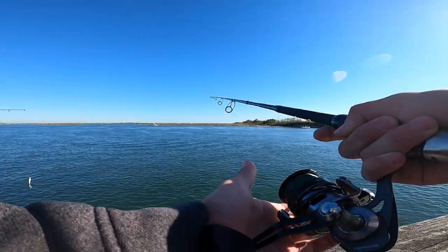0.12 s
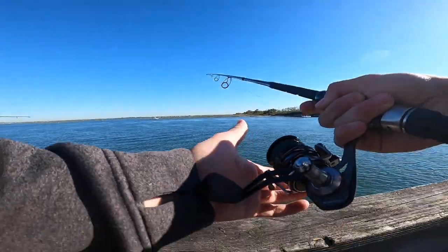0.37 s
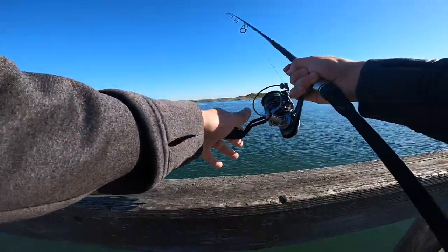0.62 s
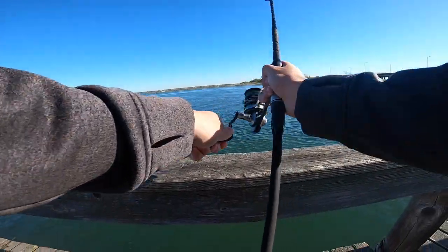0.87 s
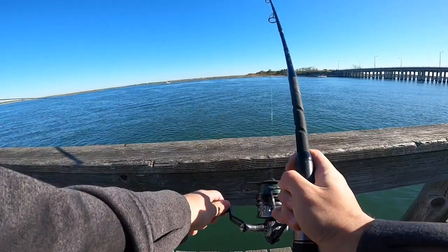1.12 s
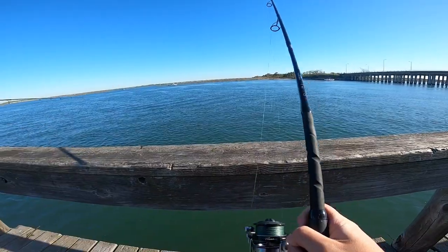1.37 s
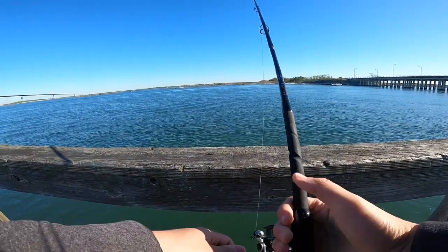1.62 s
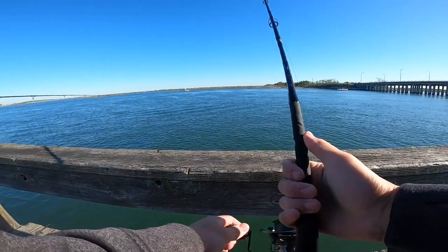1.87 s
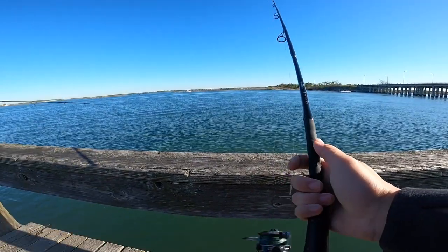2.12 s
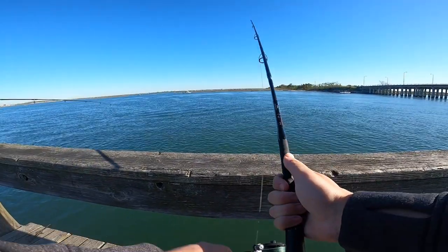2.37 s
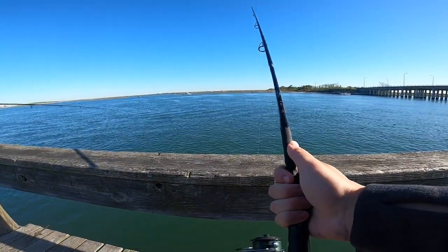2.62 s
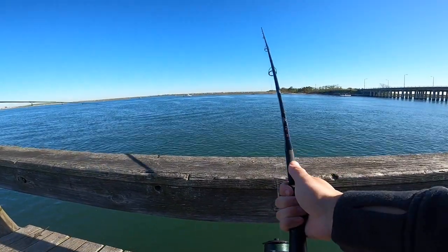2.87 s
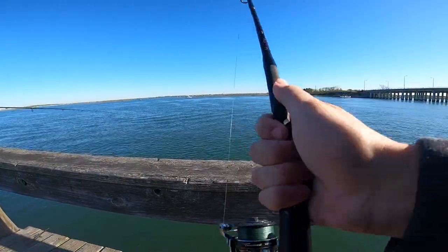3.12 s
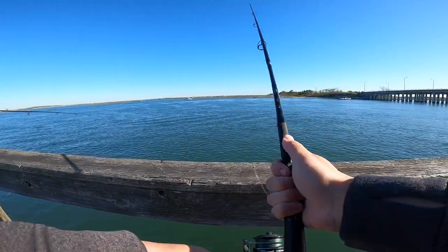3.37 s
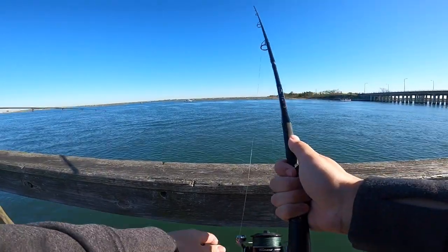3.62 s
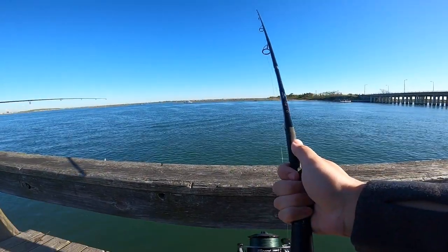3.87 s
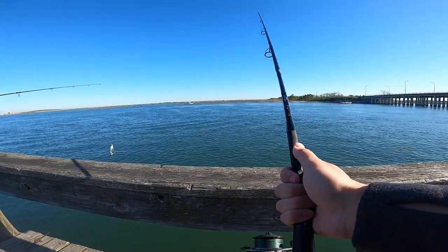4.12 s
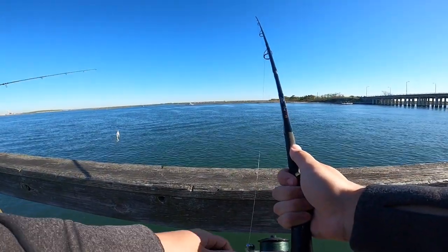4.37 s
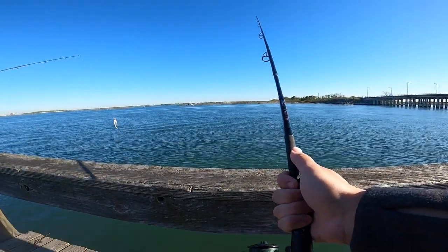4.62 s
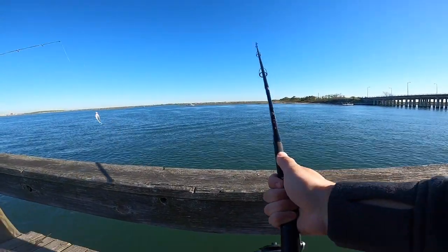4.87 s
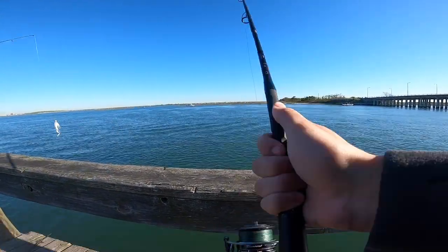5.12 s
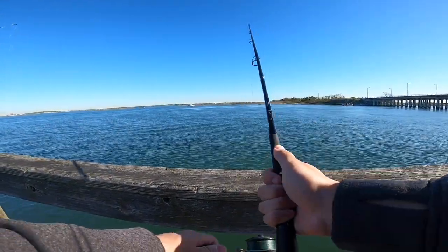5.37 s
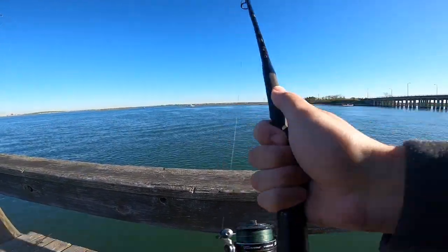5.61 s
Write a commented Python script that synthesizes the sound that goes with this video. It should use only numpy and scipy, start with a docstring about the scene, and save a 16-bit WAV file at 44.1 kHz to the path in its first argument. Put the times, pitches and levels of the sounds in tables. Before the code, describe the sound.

On an outdoor pier, a deep far engine throbs under a dull wash of water and distant traffic. Close to the microphone a fishing reel is cranked with irregular sharp clicks and fine rattling for about three seconds. A low gust thumps midway, a faint double hoot passes and a rod swishes. The wash then widens, with dull bumps, a thin hiss and two more short swishes.

```python
"""From the start a far engine throbs near 44 Hz, by beating tones, under a wash of water and traffic: shaped
noise. A reel is cranked close by for three seconds: parts strike, rebound and ring body modes, amid dense ticks
and knocks. A gust of low noise passes, a faint hoot sounds twice and a rod swishes: fluttering noise with
vortex whistles. The stereo image then widens; a gust thumps low, then a thin high hiss. Two more swishes close
the scene, the last among a few clicks."""
import sys
import numpy as np
from scipy import signal
from scipy.fft import rfft, irfft, next_fast_len
from scipy.io import wavfile
from scipy.ndimage import uniform_filter1d

SR = 44100
rng = np.random.default_rng(int(sys.argv[2]) if len(sys.argv) > 2 else 0)


def invert_db(x):
    """Field ratio 10**(x/20) for x, a level in decibels (scalar or array-like)."""
    u = np.asarray(x, float) / 20
    return 10 ** u


def master(y):
    """Save y as 16-bit WAV."""
    cut = np.clip(np.atleast_2d(y).T, -1, 1)
    pcm = np.round(cut * 32767)  # scale
    wavfile.write(sys.argv[1], SR, pcm.astype(np.int16))


N = 253123
T = np.arange(N) / SR

# Firing pitch of the engine. Each row: time in seconds, pitch in Hz.
FIRING_HZ = [(0, 45.03), (1.85, 45.03), (2.4, 44.45), (3.2, 44.35), (3.7, 44.0), (4.2, 43.95), (4.7, 44.23),
             (5.74, 44.23)]
# Upper orders of the engine. Each row: multiple of the firing pitch, rms in dB over the firing tone's peak.
ENGINE_ORDERS = [(2, -21.5), (6.5, -29)]
# Loudness of the firing tone. Each row: time in seconds, rms in dB.
FIRING_LEVEL = [(0, -33.5), (.55, -29.5), (1.3, -33.5), (2, -30), (3, -26.5), (4.2, -27.5), (5, -26.5),
                (5.74, -27.5)]
# Fainter tones that beat with it. Each row: pitch at start in Hz, pitch at end in Hz, first dip in seconds.
BEATING_TONES = [(40.46, 40.46, .17), (49.3, 49.76, .204)]
# Loudness of those tones, one curve for each. Each row of a curve: time in seconds, rms in dB.
BEATING_LEVELS = [
    [(0, -42), (1.2, -36.5), (1.8, -56), (3.6, -46), (5.74, -43)],
    [(0, -33), (1, -35.5), (2.2, -38), (4.3, -42), (5.74, -38)],
]
# Spectrum of the wash. Each row: frequency in Hz, relative density in dB per Hz.
WASH_SPECTRUM = [(38, -10), (64, -1.5), (92, -10.5), (252, -19), (380, -22), (614, -32.5), (807, -35.5),
                 (1010, -32), (1560, -36), (2110, -47), (3250, -52.5), (8100, -73.5), (9940, -99)]
# Drift of the wash. Each row: time in seconds, relative level in dB, centre of the tyre-roar hump in Hz.
WASH_DRIFT = [(0, 9.5, 950), (0.503, 10, 1094), (1, 10, 1354), (1.7, 7, 1107), (2.499, 6, 1410),
              (3.499, 5.5, 1235), (4.498, 5, 1605), (5.74, 8, 1490)]
# Side part of the wash before the stereo image widens. Each row: frequency in Hz, side over mid in dB.
WASH_SIDE_RATIO = [(60, -36), (180, -61), (550, -22.5), (1650, -20.5), (4970, -12.5), (15000, 1)]
# Opening of the stereo width. Each row: time in seconds, gain of the side part in dB.
SIDE_OPENING = [(3.25, -54), (3.5, -3.5), (4, 8.5)]
# Wind gusts on the ports. Each row: centre in seconds, rms at the centre in dB, time to 1/e in seconds.
WIND_GUSTS = [(1.76, -26, 0.11), (4.571, -25.5, 0.043)]
# Fine rattle of gears and line while the handle turns. Each row: time in seconds, level in dB.
RATTLE_LEVEL = [(0, -78.5), (.3, -80), (.5, -59.5), (.65, -52.5), (.85, -63.5), (.95, -57), (1.05, -60.5),
                (1.5, -63), (1.85, -58.5), (2, -66), (2.25, -59), (2.65, -66.5), (3.1, -64), (3.32, -67.5),
                (3.4, -73), (3.8, -120)]
# Spectrum of the fine rattle. Each row: frequency in Hz, relative density in dB per Hz.
RATTLE_SPECTRUM = [(1500, -38), (2500, -5), (4600, -8), (8500, -14), (11000, -14), (15500, -25)]
# Larger reel clicks. Each row: start of the blow in seconds, peak in dB before the high-pass, centre in Hz.
REEL_CLICKS = [(0.097, -52, 7000), (0.217, -53, 5830), (0.279, -53, 7500), (0.332, -31.5, 6660),
               (0.354, -46, 8200), (0.371, -39, 3250), (0.434, -33.5, 4600), (0.459, -33, 4400),
                (0.501, -48, 5500), (0.526, -35.5, 7300), (0.583, -32, 6650), (0.593, -27.5, 4000),
               (0.618, -32, 3000), (0.6623, -32, 3790), (0.6842, -27, 3950), (0.7496, -35, 4400),
               (0.779, -37, 4440),  (0.7954, -32.5, 3800), (0.813, -31.5, 3900),  (0.852, -43, 4670),
               (0.9057, -31, 5040), (0.9329, -23.5, 4100), (0.9684, -35, 3200), (1.0357, -36, 4600),
               (1.0914, -43.5, 7300), (1.1305, -32.5, 3200), (1.158, -38, 6740), (1.216, -31.5, 4630),
               (1.229, -29.5, 6400), (1.343, -34.5, 3770),  (1.4702, -39, 3260),  (1.556, -43, 2880),
               (1.5895, -23, 4630), (1.595, -25, 4350), (1.622, -28.5, 4000), (1.636, -17.5, 3940),
                (1.692, -39, 7150), (1.726, -24.5, 6800), (1.731, -35.5, 5950), (1.7782, -35.5, 4400),
               (1.807, -23, 4900), (1.8175, -32.5, 3850), (1.9386, -39, 6700), (2.122, -39, 3060),
               (2.161, -31, 5800), (2.167, -46, 3500), (2.189, -26, 5200), (2.215, -43, 3500),
               (2.2407, -37, 6650), (2.274, -25, 5000), (2.28, -37, 5450), (2.3255, -41, 4570),
               (2.382, -34.5, 3900), (2.394, -27.5, 6400), (2.435, -25.5, 4580), (2.4572, -32, 7600),
               (2.485, -36.5, 5600),  (2.564, -33, 3680), (2.583, -32, 7640), (2.7115, -37, 3420),
               (2.7651, -44, 3080), (2.876, -32.5, 3670), (2.9266, -18.5, 5400), (2.981, -23, 4400),
               (3.003, -26, 4800), (3.039, -27.5, 4150), (3.055, -45, 3800), (3.111, -37.5, 7150),
               (3.125, -41, 7660), (3.226, -43.5, 6200), (3.239, -42, 6200), (3.269, -41, 7500),
               (3.279, -28.5, 4300), (3.292, -41, 4260), (3.301, -39, 5960), (3.574, -46, 3270),
                (4.948, -52, 7460), (5.003, -49, 4300), (5.121, -47, 4340), (5.464, -46, 5470),
               (5.505, -40, 1710), (5.56, -37, 3410)]
# Modes of the reel body. Each row: frequency in Hz, relative level in dB, decay by 60 dB in seconds.
REEL_MODES = [(2300, 7, 0.04), (2700, 7, 0.0085), (3300, 8, 0.012), (4000, 2, 0.017), (4730, 6, 0.012),
              (5500, 0, 0.024), (6600, 13.5, 0.0043), (7450, 8, 0.021), (8430, 7, 0.024)]
# Dull knocks through rod and clothing; the rows near 4.5 s are low thumps of the gust on the ports. # Each row:
# start in seconds, relative level in dB, pitch in Hz, decay by 60 dB in seconds.
KNOCKS_AND_THUMPS = [(0.57, -29, 365, 0.054), (0.582, -29.5, 580, 0.045), (0.6707, -15.5, 370, 0.014),
                     (1.002, -17, 100, 0.13), (1.023, -24, 185, 0.11), (1.478, -30.5, 502, 0.06),
                     (3.604, -32, 533, 0.069), (4.508, -24, 58.6, 0.11), (4.554, -22.5, 150, 0.033),
                     (4.571, -24, 67.5, 0.072)]
# Faint far hoots. Each row: centre in seconds, tone peak in dB, time to 1/e in seconds.
FAR_HOOTS = [(2.88, -40.5, 0.03), (2.99, -42.5, 0.03)]
# Rod swishes. Each row: pip in seconds, fastest moment in seconds, level there in dB, swell in dB per second,
# shedding pitch at the top in Hz, pitch at rest in Hz, fade in dB per second, whistle lingering in seconds.
ROD_SWISHES = [(3.099, 3.144, -42.5, 277, 1129, 1043, 275, 0.019),
               (5.061, 5.086, -42.5, 217, 1227, 1020, 239, 0.065),
               (5.541, 5.574, -37.5, 479, 1770, 1385, 219, 0.02)]
# Spectrum of the rushing air. Each row: frequency in Hz, relative density in dB per Hz.
RUSH_SPECTRUM = [(1000, 2.5), (1700, 9.5), (2260, -11), (2400, -3.5), (3490, 3.5), (5520, -15),
                 (12000, -28.5), (15600, -75.5)]
# Partials of the whistle. Each row: multiple of the shedding pitch, relative level in dB.
WHISTLE_PARTIALS = [(1, 1), (2, 2.5), (3, 3)]
# Faint high hiss, perhaps line through the guides. Each row: time in seconds, relative level in dB.
HISS_LEVEL = [(4.7, -125), (4.748, -78), (4.762, -64.5), (4.845, -60), (4.875, -63), (4.91, -69), (5, -70),
              (5.1, -125)]
# Spectrum of that hiss. Each row: frequency in Hz, relative density in dB per Hz.
HISS_SPECTRUM = [(3800, -10.5), (4600, -13), (5600, -12), (7200, -17), (9000, -22.5), (12000, -51)]
# Thin sinking bands in it. Each row: frequency at first in Hz, relative level in dB.
HISS_BANDS = [(4800, -4), (5650, -2), (7100, -9), (7900, -13)]
# Treble loss of the sealed microphone ports. Each row: frequency in Hz, gain in dB.
PORT_RESPONSE = [(8500, -1), (10000, -7), (16000, -16.5)]


def evened(x):
    """Normalisation of power: scales to rms 1."""
    return x / np.sqrt(np.mean(x ** 2) + 1e-20)


def read(points, hz):
    """Interpolation of a spectrum on a logarithmic frequency axis."""
    f, value = np.transpose(points)
    return np.interp(np.log(hz + 1), np.log(f + 1), value)


def level(rows):
    """Amplitude envelope: gain interpolated along a curve of seconds and dB."""
    return invert_db(np.interp(T, *np.transpose(rows)))


def uneven(noise, size, db):
    """Random amplitude modulation: a gain from noise averaged over size samples, wandering by db rms."""
    return invert_db(db * evened(uniform_filter1d(noise, size=size)))


def bump(rows):
    """Superposition of Gaussian envelopes, each row giving centre, level and time to 1/e."""
    return sum(invert_db(db) * np.exp(-((T - s) / half) ** 2) for s, db, half in rows)


def add(mix, s, sound):
    """Superposition: mixes a sound in at s seconds."""
    part = mix[max(round(s * SR), 0):][:len(sound)]
    part += sound[:len(part)]


def coloured(x, points):
    """Linear filtering in the frequency domain by a spectrum, then rms 1."""
    size = next_fast_len(len(x))
    gain = invert_db(read(points, np.fft.rfftfreq(size, 1 / SR)))
    return evened(irfft(rfft(x, size) * gain, size)[:len(x)])


def resonate(x, hz, width_hz):
    """Heterodyne resonator: shifts the curve hz down to zero, smooths, and shifts back."""
    turn = np.exp(2j * np.pi * np.cumsum(hz * np.ones(len(x))) / SR)
    r = np.exp(-np.pi * width_hz / SR)
    return 2 * (turn * signal.lfilter([1 - r], [1, -r], x / turn)).real


def resonate_twice(x, hz, width_hz):
    """Cascaded resonance: two equal resonators in series give steeper skirts."""
    return resonate(resonate(x, hz, width_hz), hz, width_hz)


def engine():
    """Beating: two close tones interfere with the firing tone and make it throb."""
    hz = np.interp(T, *np.transpose(FIRING_HZ))
    turns = np.cumsum(hz) / SR
    tone = np.cos(2 * np.pi * turns)
    for k, db in ENGINE_ORDERS:  # the upper orders arrive smeared by the air
        tone += invert_db(db) * evened(resonate(rng.standard_normal(N), k * hz, 2.2))
    out = level(FIRING_LEVEL) * tone
    for (start_hz, end_hz, dip_s), rows in zip(BEATING_TONES, BEATING_LEVELS):
        ahead = np.cumsum(np.linspace(start_hz, end_hz, N)) / SR - turns
        # opposite in phase to the firing tone at dip_s
        phase = turns + ahead - np.interp(dip_s, T, ahead)
        out -= level(rows) * np.cos(2 * np.pi * phase)
    return np.sqrt(2) * out


def wash():
    """Random-phase spectral synthesis: mid and side of patchy noise with a slowly moving hump."""
    mid_rms_db, patchy_db = -33, 1.5
    hump_db, hump_width = 7.0, 0.53  # width in natural-log frequency
    frames, hz = N // 256 + 5, np.fft.rfftfreq(1024, 1 / SR)
    a, b, c, d, patches = rng.standard_normal((frames, 513, 5)).T
    patches = uniform_filter1d(patches, size=10, axis=0)
    patches = evened(uniform_filter1d(patches, size=14, axis=1))
    s, db, centre = np.transpose(WASH_DRIFT)
    t = np.arange(frames) * 256 / SR
    distance = np.log((hz[:, None] + 1) / np.interp(t, s, centre))
    hump = hump_db * np.exp(-(distance / hump_width) ** 2)
    side_gain = invert_db(read(WASH_SIDE_RATIO, hz))[:, None]
    z = np.array([a + 1j * b, (c + 1j * d) * side_gain])
    z *= invert_db(read(WASH_SPECTRUM, hz)[:, None] + hump + patchy_db * patches + np.interp(t, s, db))
    mid, side = signal.istft(z, nperseg=1024, noverlap=768)[1][:, :N]
    return invert_db(mid_rms_db) * np.array([mid, side]) / np.std(mid)


def wind():
    """Turbulent pressure noise: lumpy low noise as a light breeze and a few gusts."""
    breeze_db = -65
    lumps = uneven(rng.standard_normal(N), 900, 1.5)
    spectrum = [(15, -3.0), (60, 2.5), (200, -12.0), (400, -28.5), (900, -73.5)]  # (Hz, dB per Hz)
    return (invert_db(breeze_db) + bump(WIND_GUSTS)) * coloured(lumps * rng.standard_normal(N), spectrum)


def rattle(blows):
    """Random impulse train: dense ticks of uneven size, smeared, coloured by body modes, thicker near blows."""
    ticks_per_s, uneven_db, smear_s = 400, 3.5, 0.0027
    shake_db = -12.0
    sizes = invert_db(uneven_db * np.minimum(rng.exponential(1, N), 4))
    ticks = sizes * (rng.random(N) < ticks_per_s / SR)
    smear = np.sqrt(signal.lfilter([1], [1, -np.exp(-1 / (smear_s * SR))], ticks ** 2) + 0.35)
    shaken = np.sqrt(abs(uniform_filter1d(uniform_filter1d(blows ** 2, size=1500), size=1500)))
    grit = coloured(smear * rng.standard_normal(N), RATTLE_SPECTRUM)
    body = evened(sum(resonate(grit, hz, 2 / t60 + 200) for hz, _, t60 in REEL_MODES))
    return (level(RATTLE_LEVEL) + invert_db(shake_db) * shaken) * evened(grit + body)


def rattle_treble(spectrum):
    """Stationary noise under an envelope: smooth treble that follows the rattle level."""
    return level(RATTLE_LEVEL) * coloured(rng.standard_normal(N), spectrum)


def strays():
    """Random point process: rows like the larger clicks, densest where the rattle is strong."""
    count, top_db, spread_db = 36, -44, 10
    when, size, colour = rng.random((count, 3)).T
    share = np.cumsum(level(RATTLE_LEVEL) ** 1.1)
    seconds = np.interp(when, share / share[-1], T)
    return list(zip(seconds, top_db - spread_db * size, 3100 * 2.0 ** colour))


def clicks():
    """Impact excitation of modes: a loose part scrapes in, strikes and rebounds twice, cracking and ringing."""
    ring_db, scuff_db, bounce_db = -3.5, -10.0, -9.0
    spread, crack_width_hz = 0.21, 2600  # spread in natural-log frequency
    lead_s, scuff_s = 0.001, 0.0051
    contact_s = .0004  # metal on metal touches briefly
    t, out = np.arange(-900, 2500) / SR, np.zeros(N)
    ring_t = t - t[0]
    modes_hz, db, t60 = (c[:, None] for c in np.transpose(REEL_MODES))
    for s, peak_db, centre_hz in REEL_CLICKS + strays():
        luck, noise = rng.random((3, len(REEL_MODES), 1)), rng.standard_normal(len(t))
        hz = modes_hz * (1 + 0.046 * (luck[2] - .5))  # the grip detunes the body a little
        near = np.exp(-(np.log(hz / centre_hz) / spread) ** 2) + 0.22
        near *= invert_db(-10 * luck[0])  # each blow lands on another spot
        ring = (near * invert_db(db - 60 * ring_t / t60) * np.sin(2 * np.pi * hz * ring_t)).sum(0)
        first, second = luck[1, 0], luck[1, 1]
        delays = np.array([0 * first, 0.0022 + 0.0033 * first, 0.0024 + 0.0036 * second])
        late = t - .001 - delays
        contacts = np.exp(np.minimum(-late, 4 * late) / contact_s)
        strikes = np.sign(noise) * (invert_db(bounce_db * np.arange(3))[:, None] * contacts).sum(0)
        scuff = noise * invert_db(scuff_db) * np.exp(np.where(t > 0, -t / scuff_s, t / lead_s))
        crack = resonate_twice(strikes + scuff, centre_hz, crack_width_hz)
        # small parts give no low crack
        high_pass = signal.butter(3, .7 * centre_hz, "high", fs=SR, output="sos")
        crack = signal.sosfilt(high_pass, crack)
        rung = signal.fftconvolve(strikes, ring)[:len(t)]
        hit = crack / abs(crack).max() + invert_db(ring_db) * rung / abs(rung).max()
        add(out, s + t[0], invert_db(peak_db) * hit / abs(hit).max())
    return signal.sosfilt(signal.butter(2, 1100, "high", fs=SR, output="sos"), out)


def knocks():
    """Damped oscillation: soft-edged tones sag in pitch, with a broad puff that grows in the higher knocks."""
    sag, sag_s, puff_db, woody_hz = 0.3, 0.016, -9.0, 170
    t, out = np.arange(6000) / SR, np.zeros(N)
    for s, level_db, hz, t60 in KNOCKS_AND_THUMPS:
        woody = max(hz / woody_hz, 1)
        turns = hz * t * (1 + sag / woody * np.exp(-t / sag_s))
        puff = evened(resonate_twice(rng.standard_normal(len(t)), hz, 1.07 * hz))
        body = 2 * np.sin(2 * np.pi * turns) / np.sqrt(woody) + invert_db(puff_db) * woody * puff
        onset = (1 - np.exp(-t * hz * 6.9)) ** 2
        add(out, s, invert_db(level_db - 60 * t / t60) * onset * body)
    return out


def hoot():
    """Tone with narrow-band noise at the same pitch, under Gaussian envelopes."""
    hz = 500
    breath = evened(resonate(rng.standard_normal(N), hz, 40))
    return bump(FAR_HOOTS) * (np.sin(2 * np.pi * hz * T) + .4 * breath)


def swishes():
    """Vortex shedding: fluttering air, thin streaks from guides and line, and broken whistles that settle."""
    width_hz, flutter_db, broken_db = 100, 2.2, 3.0
    whistle_db, streak_db = -6.5, -1.5
    dull_db_per_hz, droop_per_s = .07, .4
    round_s, settle_s = .025, 0.022
    linger_db_per_s = 105  # the whistle lingers against the rush
    pip_hz, pip_db, pip_s = 1490, -35, .013  # a short pure pip opens each stroke; rms at its top
    t, out = np.arange(-.2, .2, 1 / SR), np.zeros(N)
    for start_s, top_s, top_db, swell_db_per_s, top_hz, rest_hz, fade_db_per_s, linger_s in ROD_SWISHES:
        slope = np.where(t < 0, swell_db_per_s, fade_db_per_s)
        db = top_db - slope * (np.hypot(t, round_s) - round_s)
        # the pitch glides from the pip to the top, then falls to rest as the tip slows
        hz = np.interp(t, [start_s - top_s + pip_s, 0], [pip_hz, top_hz])
        hz = hz - (top_hz - rest_hz) * (1 - np.exp(-np.maximum(t, 0) / settle_s))
        air = rng.standard_normal((16, len(t)))
        flutter = uneven(air[2], 200, flutter_db)
        broken = [uneven(row, 500, broken_db) for row in air[3:]]

        def thin(f):
            """Narrow-band noise at the frequency f."""
            return evened(resonate_twice(air[0], f, width_hz))

        since_pip = t + top_s - start_s
        tilt = np.minimum(t, linger_s) - 2 * np.maximum(t - linger_s, 0)
        after_pip = np.clip(since_pip / pip_s - 1, 0, 1) * invert_db(linger_db_per_s * tilt)
        whistle = 0
        for (k, partial_db), gain in zip(WHISTLE_PARTIALS, broken):
            # the upper overtone comes in as the pitch falls
            dull_db = dull_db_per_hz * (k > 2) * np.maximum(hz - 1250, 0)
            tone = .8 * thin(k * hz) + 0.6 * np.sin(2 * np.pi * k * np.cumsum(hz) / SR)
            whistle = whistle + gain * invert_db(partial_db - dull_db) * tone
        streak_hz = np.geomspace(1800, 4800, num=10) * rng.uniform(1.0, 1.05, size=10)
        streaks = evened(sum(gain * invert_db(read(RUSH_SPECTRUM, f)) * thin(f * (1 - droop_per_s * t))
                             for f, gain in zip(streak_hz, broken[3:])))
        rush = flutter * coloured(air[1], RUSH_SPECTRUM) + invert_db(streak_db) * streaks
        pip_width = np.where(since_pip < 0, pip_s / 3, pip_s)
        pip = np.exp(-(since_pip / pip_width) ** 2) * np.sin(2 * np.pi * pip_hz * t)
        stroke = invert_db(db) * (rush + invert_db(whistle_db) * after_pip * whistle)
        add(out, top_s + t[0], stroke + invert_db(pip_db) * np.sqrt(2) * pip)
    return out


def line_hiss():
    """Band-filtered noise: a faint uneven high hiss with thin bands that sink in pitch."""
    sag_per_s, bands_db, broad_db = .15, -4, 3.0
    noise = rng.standard_normal(N)
    sink = 1 - sag_per_s * np.clip(T - HISS_LEVEL[1][0], 0, .2)
    bands = sum(invert_db(db) * evened(resonate_twice(noise, hz * sink, 500)) for hz, db in HISS_BANDS)
    broad = coloured(noise, HISS_SPECTRUM)
    gain = level(HISS_LEVEL) * uneven(rng.standard_normal(N), 500, 1.5)
    return gain * (invert_db(broad_db) * broad + invert_db(bands_db) * bands)


def scene():
    """Mid-side superposition: near sounds mostly central; wash, rod, wind and reel treble have a side part."""
    mid, side = wash()
    blows, rod = clicks(), swishes() + line_hiss()
    mid += engine() + wind() + blows + rattle(blows) + knocks() + hoot() + rod
    # the rod is off to the right: right leads by a few samples, so its side part is a slope
    side = level(SIDE_OPENING) * (side + invert_db(-2.5) * wind() - invert_db(-8) * np.gradient(rod))
    # the ports hear the finest treble of the blows unalike
    side += invert_db(-24) * np.gradient(np.roll(blows, 40))
    # the topmost hiss of the rattle is wide; spectra in (Hz, dB per Hz)
    side += invert_db(-4) * rattle_treble([(9500, -48.0), (11500, 0.5), (15000, -3)])
    # smooth top of the whirr
    mid += invert_db(-12.5) * rattle_treble([(7000, -37.0), (10000, -8.0), (15000, -1.0), (15800, -72.0)])
    return np.array([mid + side, mid - side])


def roll_off(x):
    """The treble ends steeply here."""
    return signal.sosfilt(signal.butter(12, 15800, fs=SR, output="sos"), x)


def record(dry):
    """Linear-phase filtering: the treble loss of the sealed ports, then a short fade-in."""
    hz = np.linspace(0, SR / 2, num=257)
    taps = signal.firwin2(255, hz, invert_db(read(PORT_RESPONSE, hz)), fs=SR)
    padded = np.pad(dry, ((0, 0), (127, 127)), "reflect")
    heard = signal.oaconvolve(padded, taps[None], "valid")
    heard = heard * np.minimum(T / .003, 1)  # the sound opens without a click
    return roll_off(heard)


dry = scene()
out = record(dry)
master(out)
```